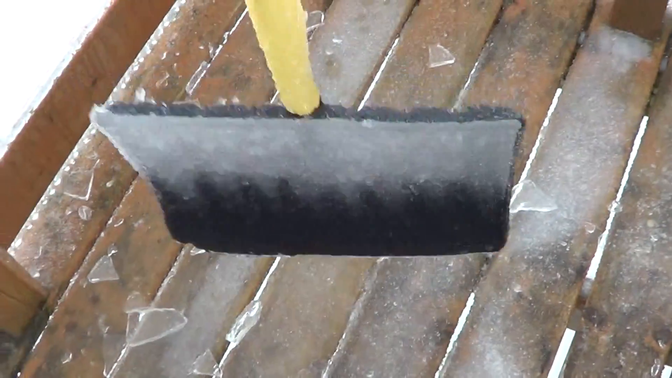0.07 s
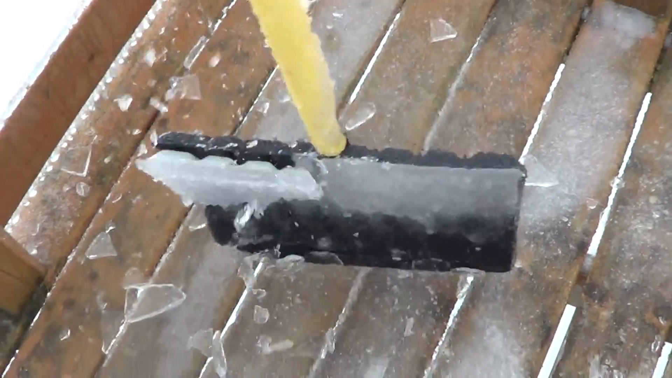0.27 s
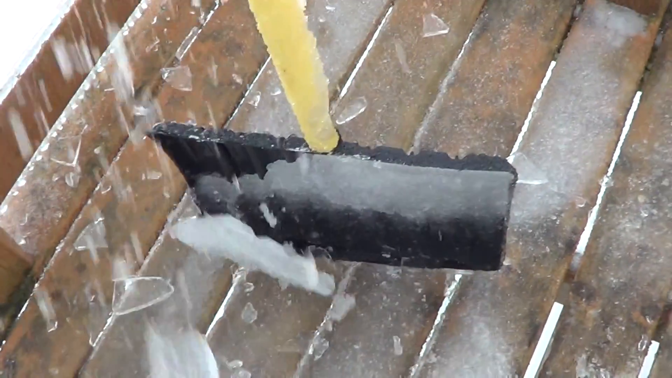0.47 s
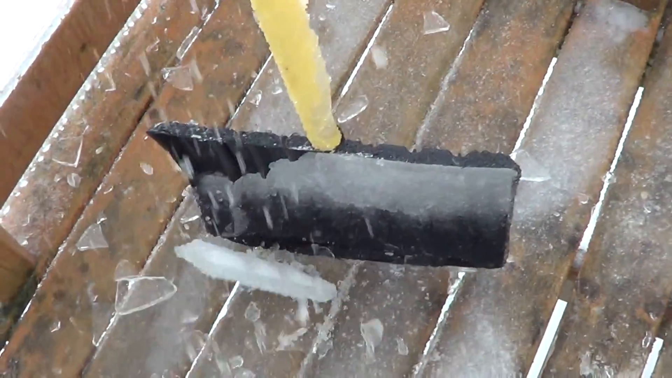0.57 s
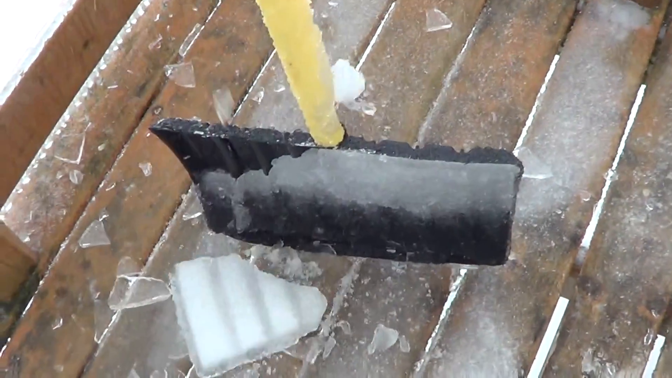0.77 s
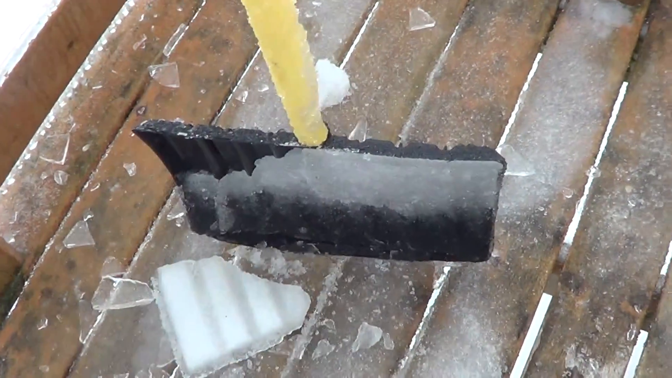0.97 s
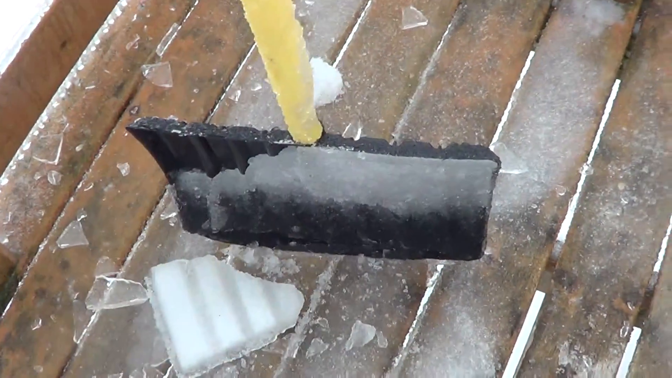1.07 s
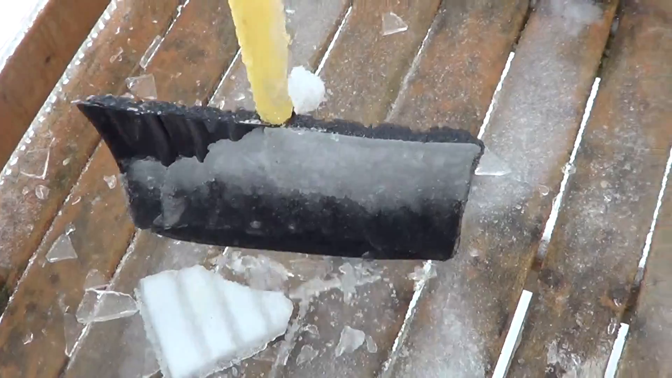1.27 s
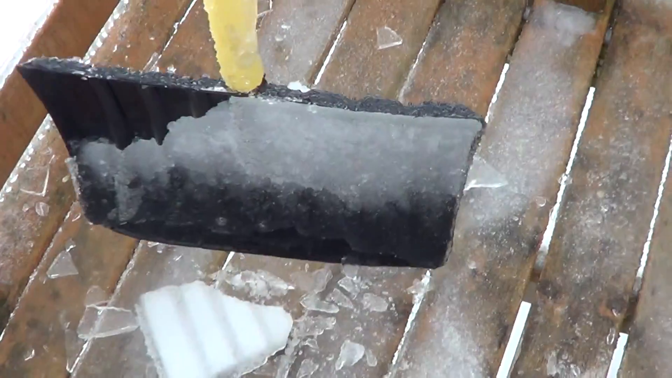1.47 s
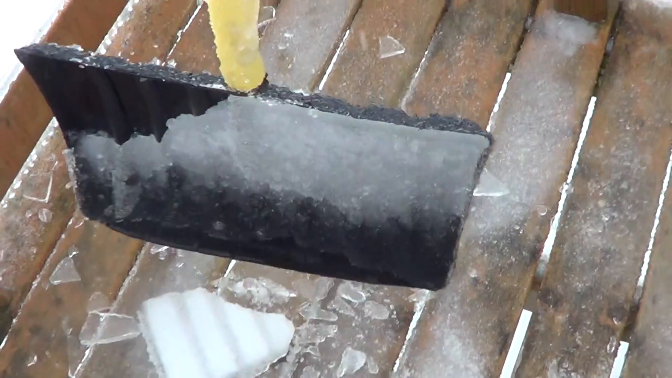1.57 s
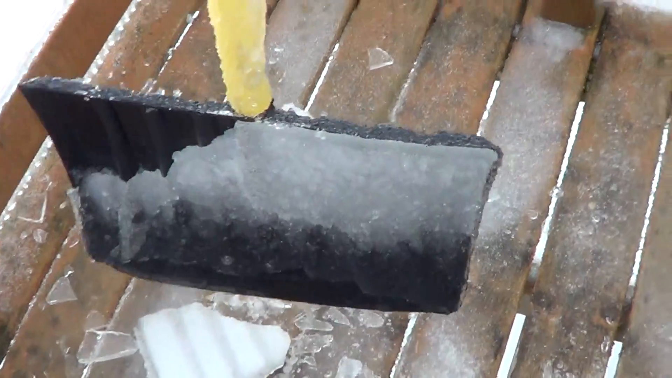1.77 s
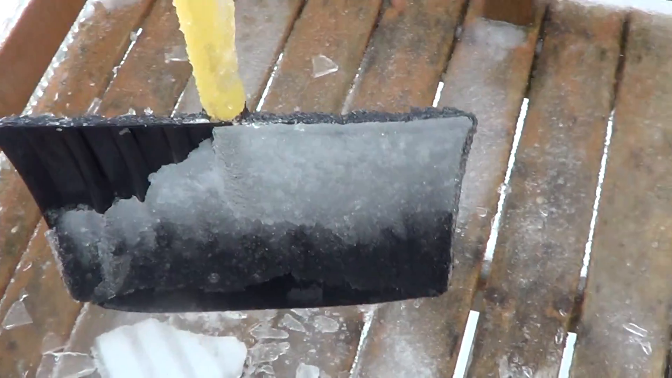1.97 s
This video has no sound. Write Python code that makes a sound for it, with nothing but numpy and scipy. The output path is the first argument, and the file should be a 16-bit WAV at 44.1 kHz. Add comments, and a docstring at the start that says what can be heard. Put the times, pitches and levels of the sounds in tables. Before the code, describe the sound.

A plastic shovel blade crunches hard into sheet ice, a broken slab knocks onto wooden deck boards, a second shove grinds and clacks, then small shards tick; outdoors, close microphone, dry, faint low wind late.

```python
"""Shovelling ice off a wooden deck

A plastic snow shovel breaks sheet ice outdoors, close by: the blade crunches in, a loosened slab lands
on the boards, and a second shove grinds over the grit. Then it is lifted; shards tick and a little wind rumbles.
Ice is made of random tiny clicks and short snaps, blade and deck of ringing modes, and wind of filtered noise."""
import sys
import numpy as np
from scipy import signal
from scipy.fft import rfft, irfft
from scipy.io import wavfile
from scipy.ndimage import uniform_filter1d

SR = 44100
rng = np.random.default_rng(int(sys.argv[2]) if len(sys.argv) > 2 else 0)


def waveform_to_disk(signal):
    """Save audio, clipped to [-1, 1], as 16-bit WAV at the path in sys.argv[1]."""
    frames = np.transpose(np.atleast_2d(signal))
    scaled = np.clip(frames, -1, 1) * 32767
    samples = np.round(scaled).astype(np.int16)
    wavfile.write(sys.argv[1], SR, samples)


N = 88200
T = np.arange(N) / SR
SHORT_T = T[:SR // 2]  # time within one short sound
CLICK = 1. * (SHORT_T == 0)  # a single sharp blow

# Ringing of the plastic blade: pitch_hz [Hz], relative level_db [dB]
BLADE_MODES = [(312, 14.5), (664, -7), (826, 1.5), (1170, 15), (1245, 6.5), (1535, 9), (1920, 4),
               (2092, 15), (2426, -9), (2703, -15.5), (2975, 5), (3800, -2.5)]
BLADE_T60_S = 0.031  # time to fall by 60 dB
CRUNCH_SPREAD_DB = 2  # how unequal the tiny clicks are


def amp(db):
    """Turn decibels into a gain."""
    return 10 ** (np.asarray(db) / 20)


def unit(x):
    """Scale to an rms of 1."""
    return x / np.sqrt(np.mean(x ** 2) + 1e-20)


def unit_energy(x):
    """Scale to a total energy of 1."""
    return x / np.linalg.norm(x)


def curves(rows):
    """Draw each column of a table as a curve over time."""
    s, *columns = np.transpose(rows)
    return [np.interp(T, s, column) for column in columns]


def add(out, s, sound):
    """Mix a sound in at its start time in seconds."""
    i = max(int(s * SR), 0)
    out[i:i + len(sound)] += sound[:N - i]


def pan(x, db):
    """Place a sound by a level difference between the ears; positive is left."""
    return x * amp([[db / 2], [-db / 2]])


def colour(x, points):
    """Shape the spectrum to the given points with a minimum-phase filter, which never sounds early."""
    hz, db = np.transpose(points)
    size = 2 * N
    bins_hz = np.arange(N + 1) * SR / size
    gain = amp(np.interp(np.log(bins_hz + 1), np.log(hz), db))
    # Folding the cepstrum gives the phase that belongs to this gain
    cepstrum = irfft(np.log(gain))
    cepstrum[1:N] *= 2
    cepstrum[N + 1:] = 0
    return irfft(rfft(x, size) * np.exp(rfft(cepstrum)))[:N]


def ring(x, hz, t60):
    """One damped mode: it rings at its pitch and falls by 60 dB in t60 seconds."""
    r = amp(-60 / (t60 * SR))
    w = 2 * np.pi * min(hz, SR / 2) / SR
    return signal.lfilter([1, 0, -1], [1, -2 * r * np.cos(w), r * r], x + 1e-18)


def resonance(x, hz, width):
    """A broad resonance with steep skirts: two equal modes in a row, each with a width as a share of its pitch."""
    t60 = np.log(1000) / (np.pi * width * hz)
    return ring(ring(x, hz, t60), hz, t60)


def struck(force, modes, pitch):
    """A struck body rings most in the modes near the pitch of the blow."""
    focus_db_per_octave = 20
    out = 0
    for hz, db, t60 in modes:
        level_db = db - focus_db_per_octave * abs(np.log2(hz / pitch))
        out = out + amp(level_db) * ring(force, hz, t60)
    return unit_energy(out)


def dying_noise(t60):
    """A decaying noise burst of unit energy."""
    return unit_energy(rng.standard_normal(SR // 2) * amp(-60 * SHORT_T / t60))


def snap(t60, hz, width):
    """A crack and its splintering: strongest around one pitch, with a thinner share at all pitches."""
    force = CLICK + dying_noise(t60)
    around_pitch = unit_energy(resonance(force, hz, width))
    return unit_energy(around_pitch + amp(-9) * unit_energy(force))


def grains(per_s, spread_db):
    """Tiny fractures at random, many weak and few strong, kept at an even mean level."""
    even_s = .03
    happens = rng.random(N) < per_s / SR
    strength = amp(spread_db * np.minimum(rng.exponential(1, N), 5))
    clicks = happens * rng.choice([-1, 1], N) * strength
    power = uniform_filter1d(clicks ** 2, max(int(even_s * SR), 2))
    return clicks / np.sqrt(np.abs(power) + 1e-4)


def tinted(force):
    """Every grain is stronger in some bands than in others, so each has its own colour."""
    spread_db = 8
    edges_hz = np.r_[150, np.geomspace(500, 17000, 15)]
    out = 0
    for low, high in zip(edges_hz, edges_hz[1:]):
        level_db = spread_db * np.clip(rng.standard_normal(N), -2, 2)
        strength = amp(level_db) * rng.choice([-1, 1], N)
        band = signal.butter(2, [low, high], "band", fs=SR, output="sos")
        out = out + signal.sosfilt(band, force * unit(strength))
    return out


def crackle(force):
    """Fractures sound in the ice, each from its own place along the blade."""
    # Colour of the ice: pitch_hz [Hz], level_db [dB]
    ice_colour = [(300, -1.5), (1500, -7.5), (4000, -8.5), (5500, -4.5), (7500, 3.5), (9800, 4.5),
                  (12000, 0.5), (15500, -4.5)]
    place = .2 * rng.standard_normal(N)
    mid = colour(tinted(force), ice_colour)
    side = colour(tinted(force * place), ice_colour)
    return (mid + side * [[1], [-1]]) / np.linalg.norm(colour(1. * (T == 0), ice_colour))


def blade_rattle(force):
    """Fractures shake the plastic blade: a coloured rattle with some ringing of its modes."""
    # Colour of the rattle: pitch_hz [Hz], level_db [dB]
    blade_colour = [(170, -37), (400, 0), (800, 0.5), (1300, -4.5), (2200, 0), (3500, 0.5), (5500, -1),
                    (9000, -17)]
    modes = 0
    for k, (hz, db) in enumerate(BLADE_MODES):
        modes = modes + (-1) ** k * amp(db) * ring(force, hz, BLADE_T60_S)
    rattle = unit(colour(force, blade_colour)) + amp(-13.5) * unit(modes)
    return unit(rattle) * np.std(force)


def wind():
    """Low, bumpy rumble of filtered noise that grows toward the end, over a faint even hiss."""
    # Strength of the wind before its flutter: time_s [s], level_db [dB]
    gust_rows = [(0, -70), (1.0, -69.5), (1.47, -58), (1.56, -53), (1.72, -55), (1.81, -45), (1.9, -54),
                 (2, -51.5)]
    # Colour of the rumble: pitch_hz [Hz], level_db [dB]
    wind_colour = [(20, -32), (52, -9), (88, 1), (130, 2), (200, -7), (320, -10), (700, -16.5), (3000, -66)]
    flutter_db, flutter_hz, hiss_db = 2.5, 22, -64
    gust_db, = curves(gust_rows)
    flutter = np.interp(T * flutter_hz, np.arange(SR), rng.standard_normal(SR))
    rumble = unit(colour(rng.standard_normal(N), wind_colour))
    hiss = amp(hiss_db) * rng.standard_normal(N)
    return amp(gust_db + flutter_db * flutter) * rumble + hiss


def loose_crumbs(count=24):
    """Small pieces tick at random, each ringing at one of a set of pitches; rms 1."""
    crumbs_per_s, cycles_to_die = 260, 20
    clicks = grains(crumbs_per_s, CRUNCH_SPREAD_DB)
    dealt = rng.integers(0, count, N)  # which pitch each click gets
    out = 0
    for k, hz in enumerate(np.geomspace(748, 6500, count)):
        out = out + np.sqrt(hz) * ring(clicks * (dealt == k), hz, cycles_to_die / hz)
    return unit(out)


def sliding_crumbs():
    """Sparser grit and loose crumbs drag over the boards: crackling ice, a scraping blade and small ticks."""
    # Drag over time, before the trims below: time_s [s], crackle_db [dB], scrape_db [dB]
    slide_rows = [(0, -55, -58.5), (.05, -49.5, -58.5), (.12, -54.5, -61), (.205, -57.5, -60),
                  (.25, -28.5, -38.5), (.37, -35.5, -35.5), (.45, -38, -42), (.55, -33.5, -40.5),
                  (.65, -35.5, -34), (.75, -35, -36), (.93, -38, -39.5), (.985, -42.5, -51),
                  (1.18, -43.5, -49), (1.25, -40, -44), (1.30, -46.5, -52), (1.36, -36, -45),
                  (1.47, -45, -49), (1.64, -42.5, -58.5), (1.80, -60, -62), (1.92, -49, -51.5),
                  (2, -55.5, -59.5)]
    grains_per_s, spread_db = 3200, 4.0
    scrape_trim_db, crumb_trim_db = -2, -4
    ice_db, blade_db = curves(slide_rows)
    force = grains(grains_per_s, spread_db)
    ice = crackle(force * amp(ice_db))
    scrape = amp(scrape_trim_db) * blade_rattle(tinted(force * amp(blade_db)))
    return ice + scrape + amp(blade_db + crumb_trim_db) * loose_crumbs()


def shards():
    """A sharp snap and brief splintering around each shard's pitch; the shard clinks on in two partials."""
    # Single shards snap or land: start_s [s], level_db [dB], pitch_hz [Hz]
    shard_rows = [(.008, -44.5, 7940), (0.041, -38, 9400), (0.292, -21, 7900), (.317, -25, 9300),
                  (0.356, -27, 6550), (0.424, -28.5, 6940), (0.4661, -29.5, 6660), (0.484, -29, 9100),
                  (.509, -33, 6700), (0.5237, -22.5, 10740), (0.602, -20.5, 10600), (0.636, -28, 11600),
                  (.670, -28.5, 8060), (0.7031, -19.5, 5930), (0.701, -18.5, 10940), (0.7139, -21, 11200),
                  (0.7285, -23.5, 3900), (0.747, -30, 9500), (0.875, -37, 8600), (0.893, -29.5, 9050),
                  (0.91, -30.5, 8770), (.924, -30.5, 11800), (0.945, -23, 11130), (0.961, -29.5, 8100),
                  (1.248, -26.5, 8220), (1.275, -39, 9600), (1.343, -28.5, 10570), (1.363, -40, 9300),
                  (1.384, -36, 8150), (1.4225, -24, 8200), (1.424, -20.5, 8870), (1.469, -37.5, 7340),
                  (1.49, -31, 8330), (1.534, -36, 10630), (1.57, -37, 6500), (1.579, -28, 6720),
                  (1.616, -31.5, 10000), (1.637, -27.5, 6760), (1.672, -37, 9500), (1.743, -46, 9700),
                  (1.884, -38, 9400), (1.902, -34.5, 6770), (1.908, -32, 10900), (1.962, -32, 7850)]
    level_s = 0.004  # the level is that of the energy spread over this time
    splinter_t60_s, width, clink_db, clink_t60_s = 0.015, 0.9, -3.5, 0.034
    out = np.zeros(N)
    for s, db, hz in shard_rows:
        upper = ring(CLICK, 2 * hz, clink_t60_s)
        clink = unit_energy(ring(CLICK, hz, clink_t60_s) + .5 * upper)
        shard = unit_energy(snap(splinter_t60_s, hz, width) + amp(clink_db) * clink)
        add(out, s, amp(db) * np.sqrt(level_s * SR) * shard)
    return out


def deck():
    """Blows ring the boards, a long contact rattles on them, and low thumps sound from the frame below."""
    # Blows on the boards: start_s [s], level_db [dB], contact_s [s], strongest pitch_hz [Hz]
    knock_rows = [(.214, -26, 0.011, 335), (0.298, -29.5, 0.0066, 470), (0.325, -35.5, 0.0071, 306),
                  (0.478, -53, 0.0058, 340), (0.5482, -26, 0.00067, 430), (0.5538, -21, 0.0048, 580),
                  (0.557, -32, 0.0036, 190), (.579, -31.5, 0.0044, 258), (0.608, -32.5, 0.0067, 665),
                  (0.613, -38, .003, 300), (0.679, -31, 0.0025, 430), (0.709, -38, 0.016, 590),
                  (.779, -33, 0.019, 298), (0.897, -40, 0.026, 880), (1.814, -39.5, 0.016, 360)]
    # Ringing of the boards: pitch_hz [Hz], relative level_db [dB], time to fall by 60 dB t60_s [s]
    deck_modes = [(195, 3.5, 0.1), (283, -9, 0.18), (310, 6.5, 0.095), (396, 2.5, 0.05), (475, 9, 0.039),
                  (561, 8.5, 0.051), (631, 2, 0.061), (790, -2.5, 0.17), (1080, -8, 0.033)]
    # The frame thumps under the weight: start_s [s], level_db [dB]
    thump_rows = [(0.215, -37), (.25, -39), (0.294, -51), (.548, -57), (0.776, -71), (1.814, -44)]
    even_contact_s = 0.0057  # a contact this long rattles as much as it strikes
    level_s = 0.014  # the level is that of the energy spread over this time
    thump_hz, thump_t60_s = 66.3, 0.066
    out = np.zeros(N)
    for s, db, length, pitch in knock_rows:
        rattle = unit_energy(rng.standard_normal(len(SHORT_T)) * np.exp(-(SHORT_T / length) ** 2))
        force = length / even_contact_s * rattle + CLICK
        add(out, s, amp(db) * np.sqrt(level_s * SR) * struck(force, deck_modes, pitch))
    for s, db in thump_rows:
        thump = np.sin(2 * np.pi * thump_hz * SHORT_T) * amp(-60 * SHORT_T / thump_t60_s)
        add(out, s, amp(db) * thump)
    return out


def clacks():
    """Hard ice meets the blade: a sudden hollow crack, then the plastic rings briefly."""
    # Hard pieces strike the blade: start_s [s], level_db [dB], pitch_hz [Hz]
    clack_rows = [(.211, -24.5, 1990), (0.215, -27, 1200), (.2245, -24, 650), (.256, -26.5, 1570),
                  (0.282, -21, 3000), (0.2919, -25.5, 3180), (0.4244, -28.5, 1960), (.679, -29.5, 1500),
                  (0.7143, -31.5, 1130), (0.727, -30, 2500), (.759, -23.5, 1280), (0.7717, -17.5, 1250),
                  (.786, -22, 2160), (.945, -34.5, 3060), (1.007, -40, 810), (1.065, -41.5, 3620),
                  (1.106, -42.5, 1480), (1.247, -43, 1950), (1.343, -43, 2120), (1.384, -36.5, 3100),
                  (1.401, -32, 2780), (1.812, -46.5, 2500), (1.816, -45.5, 553)]
    level_s = 0.0034  # the level is that of the energy spread over this time
    splinter_t60_s, width, ring_db = 0.039, .8, -2.5
    modes = [(hz, db, BLADE_T60_S) for hz, db in BLADE_MODES]
    out = np.zeros(N)
    for s, db, hz in clack_rows:
        crack = snap(splinter_t60_s, hz, width)
        clack = unit_energy(crack + amp(ring_db) * struck(CLICK, modes, hz))
        add(out, s, amp(db) * np.sqrt(level_s * SR) * clack)
    return out


def crunches():
    """Each push releases a dense run of fractures that rises, holds and dies away; the bent blade sounds hollow."""
    # Ice crushed at the blade: start_s [s], rise_s [s], hold_s [s], fall by 60 dB t60_s [s],
    # crackle_db [dB], rattle_db [dB], hollow centre pitch_hz [Hz]
    crunch_rows = [(0.209, 0.0057, 0.013, 0.16, -18.5, -20, 1740),
                   (0.239, 0.0025, 0.0033, 0.019, -20, -22, 1370),
                   (0.254, 0.0021, 0.0048, 0.038, -24, -28, 1640),
                   (0.286, 0.0033, 0.038, 0.21, -26.5, -29.5, 623),
                   (0.462, 0.00091, 0.016, 0.062, -36.5, -37.5, 1640),
                   (0.535, 0.011, 0.0043, 0.11, -17.5, -27, 890),
                   (0.592, 0.0037, 0.014, 0.54, -32, -61, 690),
                   (0.703, 0.0018, 0.0076, 0.2, -28, -37, 1150),
                   (0.757, 0.0018, 0.0067, 0.27, -23.5, -25, 1320),
                   (0.765, 0.0039, 0.02, 0.087, -23, -24.5, 2010),
                   (0.821, 0.0054, 0.0066, 0.068, -27.5, -29, 2020),
                   (1.42, 0.0026, 0.013, 0.023, -37.5, -42.5, 820),
                   (1.812, 0.00092, 0.0022, 0.071, -32, -36, 2730)]
    grains_per_s, hollow_db, hollow_width = 5000, -6, 1  # width as a share of its centre
    force = grains(grains_per_s, CRUNCH_SPREAD_DB)
    ice_power, blade_power, hollow = np.zeros((3, N))
    for s, rise, hold, t60, ice_db, blade_db, hz in crunch_rows:
        fall = amp(-60 * np.maximum(T - s - rise - hold, 0) / t60)
        shape = np.clip((T - s) / rise, 0, 1) * fall
        ice_power += (shape * amp(ice_db)) ** 2
        blade_power += (shape * amp(blade_db)) ** 2
        push = force * shape * amp(blade_db)
        hollow += unit(resonance(push, hz, hollow_width)) * np.std(push)
    ice = crackle(force * np.sqrt(ice_power))
    blade = blade_rattle(tinted(force * np.sqrt(blade_power)))
    return ice + blade + amp(hollow_db) * hollow


def outdoors(x):
    """Boards and railing scatter a short noisy tail, slightly different in each ear."""
    # Strength of the difference between the ears: pitch_hz [Hz], level_db [dB]
    width_colour = [(300, -11.5), (700, -8.5), (2500, -12.5), (5000, -7), (8000, -9.5), (12000, -25)]
    tail_db, tail_t60_s, delay_s, side_t60_s = -10, 0.024, 0.0022, 0.062
    tail = np.zeros(N)
    add(tail, delay_s, signal.fftconvolve(x, amp(tail_db) * dying_noise(tail_t60_s)))
    side = colour(signal.fftconvolve(x, dying_noise(side_t60_s))[:N], width_colour)
    return tail + side * [[1], [-1]]


def scene():
    """Mix ice, blade, boards and wind in the open air."""
    ice_pan_db, deck_pan_db = .4, -3
    deck_scatter = 0.46  # share of the boards' sound that is scattered
    boards = deck()
    ice = crunches() + clacks() + sliding_crumbs() + shards()
    direct = pan(ice, ice_pan_db) + pan(boards, deck_pan_db) + wind()
    scattered = outdoors(ice.mean(axis=0) + deck_scatter * boards)
    return amp(-1.0) * (direct + scattered)


def record(dry):
    """Cut the extreme treble, round the highest peaks smoothly, then cut the treble again."""
    cutoff_hz, ceiling = 15900, .6
    top_cut = signal.ellip(10, .1, 70, cutoff_hz, fs=SR, output="sos")
    x = signal.sosfilt(top_cut, dry)
    rounded = x / (1 + (x / ceiling) ** 4) ** (1 / 4)
    return signal.sosfilt(top_cut, rounded)


dry = scene()
out = record(dry)
waveform_to_disk(out)
```